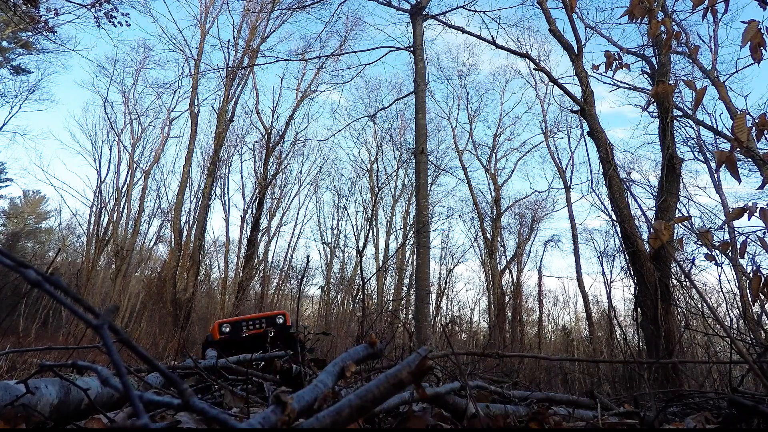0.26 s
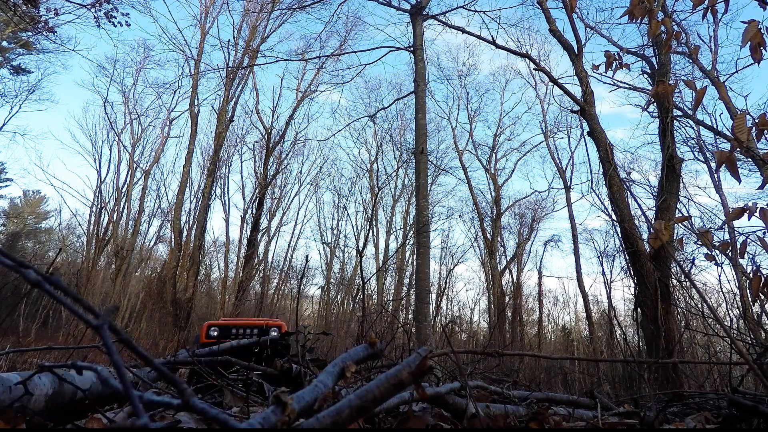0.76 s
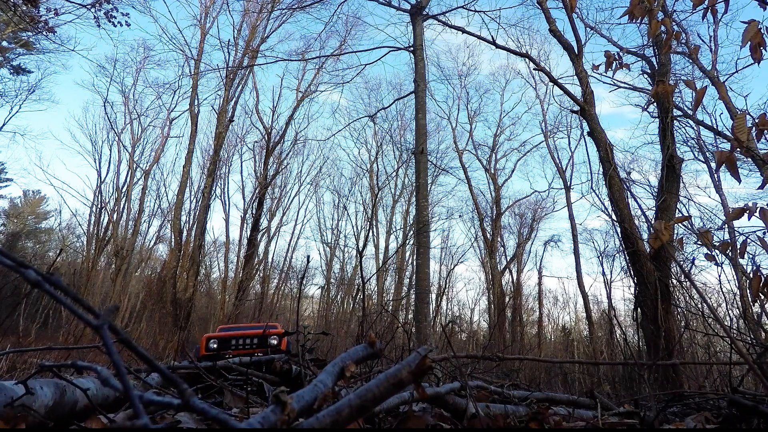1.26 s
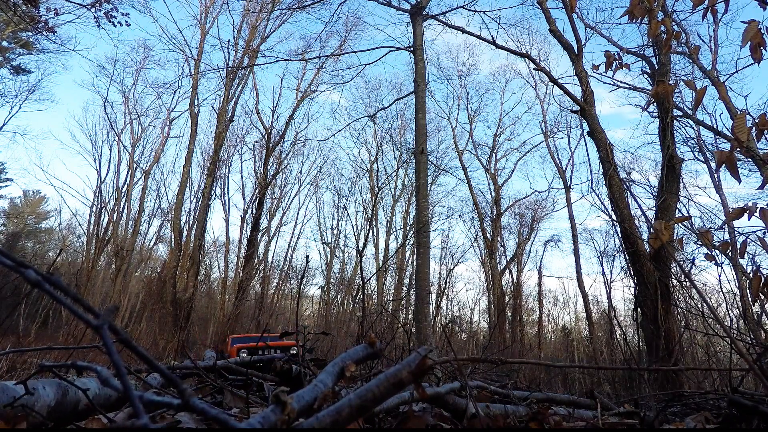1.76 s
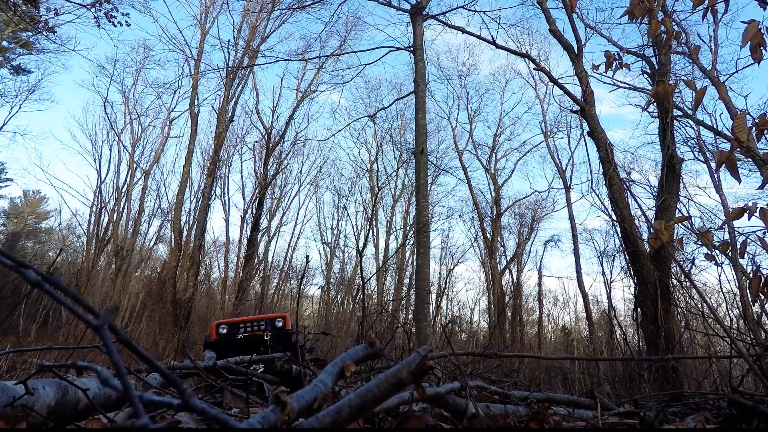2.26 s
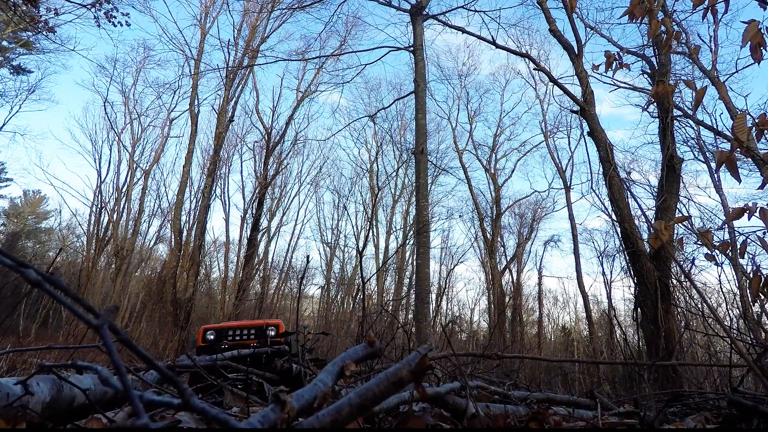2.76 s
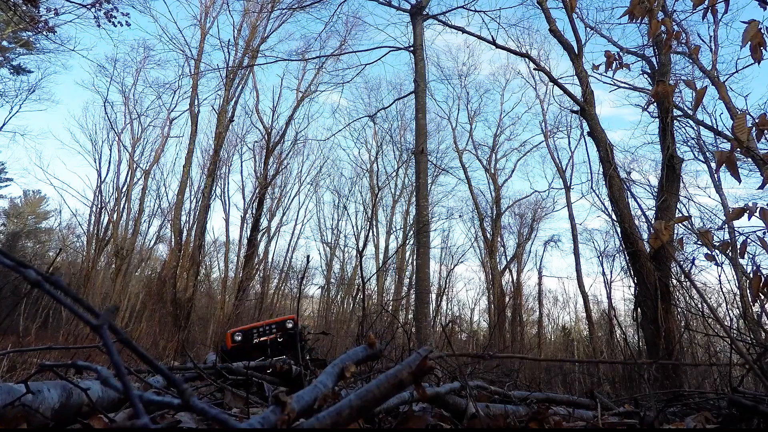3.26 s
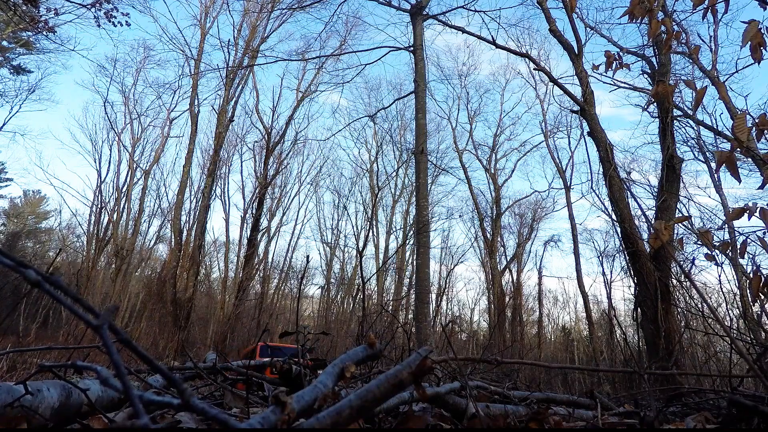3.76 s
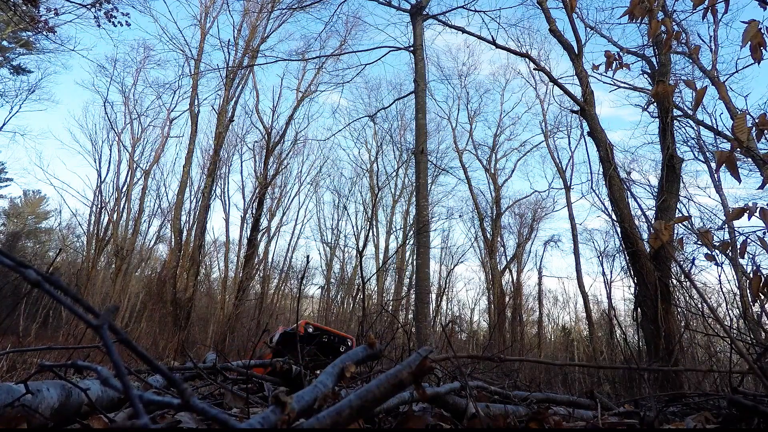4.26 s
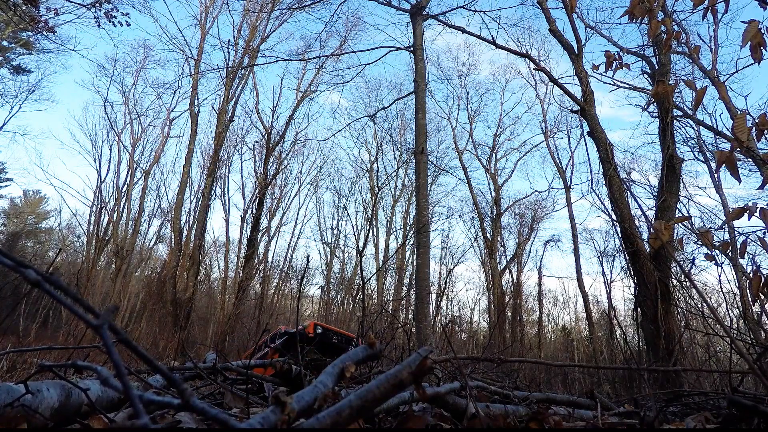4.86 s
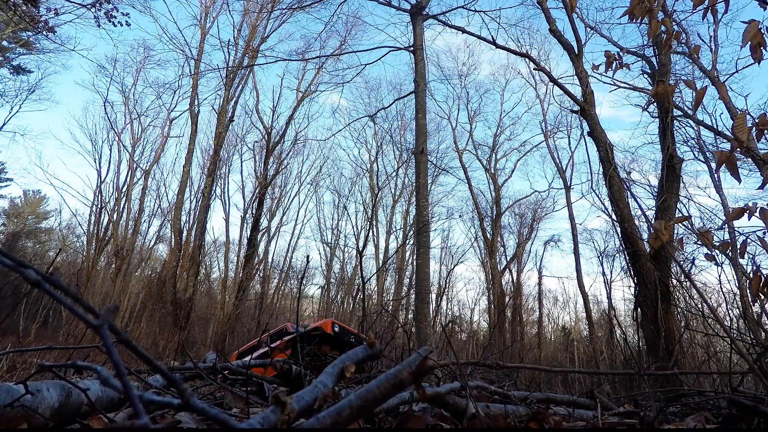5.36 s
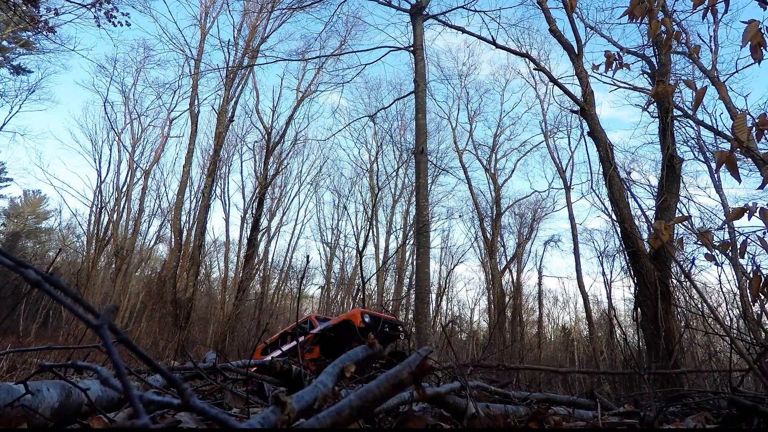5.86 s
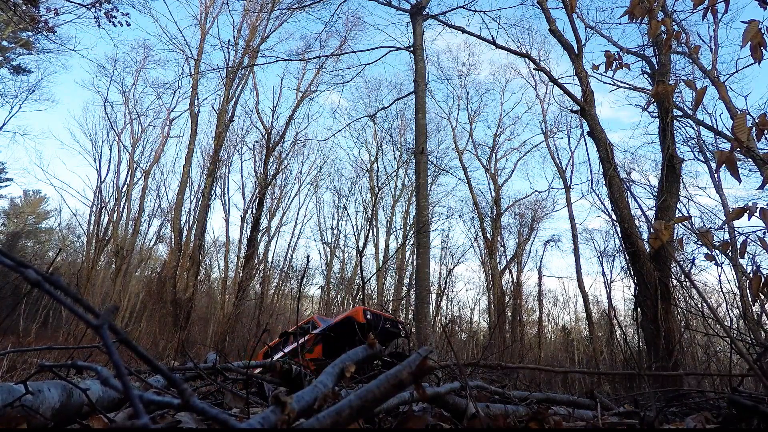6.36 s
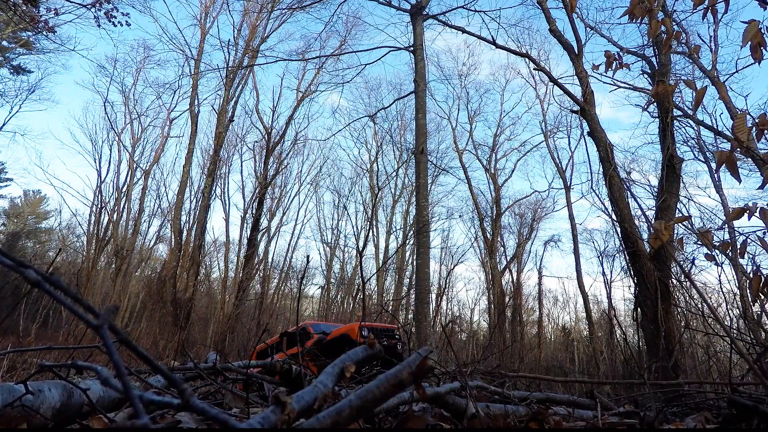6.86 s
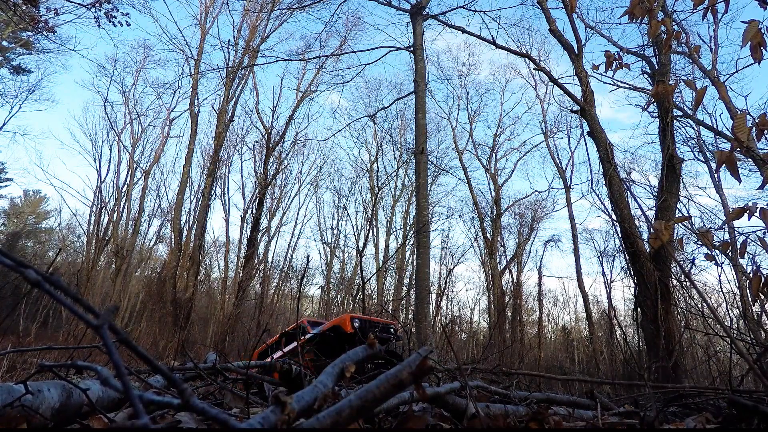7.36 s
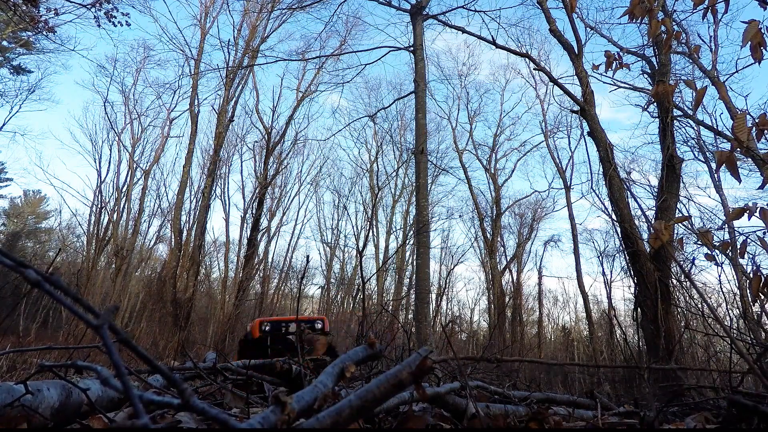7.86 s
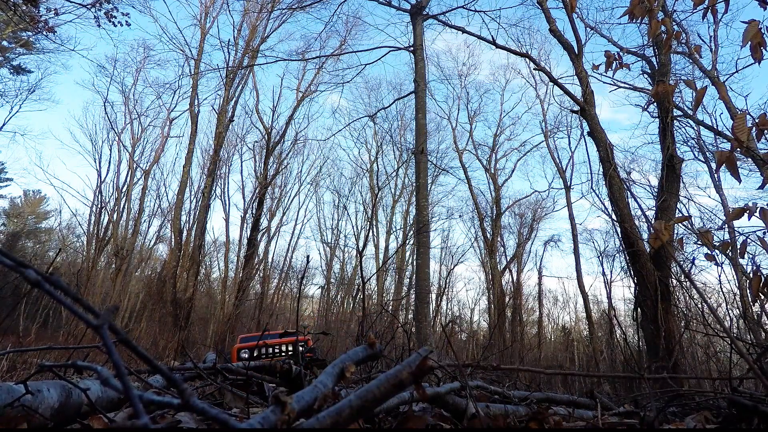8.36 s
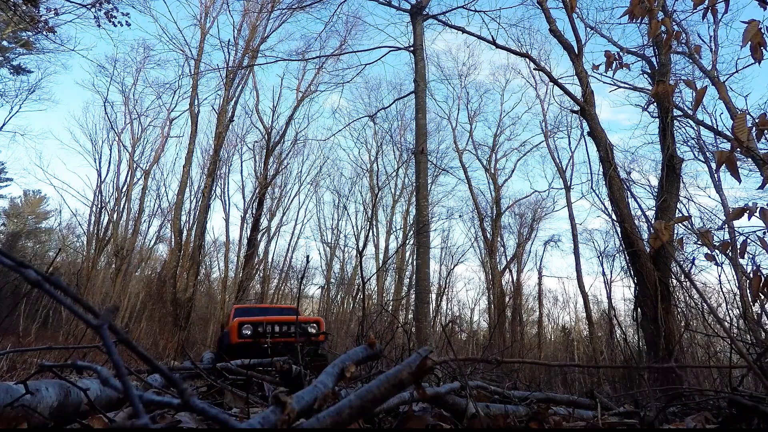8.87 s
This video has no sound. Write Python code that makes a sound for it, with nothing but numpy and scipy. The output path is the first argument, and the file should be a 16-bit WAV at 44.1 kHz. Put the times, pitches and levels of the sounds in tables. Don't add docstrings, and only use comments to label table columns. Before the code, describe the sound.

A small electric model truck works across dead branches and dry leaves in open woodland. Bursts of gritty crunching and dull, boxy knocks come with sharp twig snaps and a brief servo chirp. After a loud flurry of cracks it quietens, gears whining unsteadily through a climb, then wheels thump down off bark, a heavy knock lands, and the gears sing once more. The microphone is close and low, its case booming hollowly, with little echo.

```python
import sys
import numpy as np
from scipy import signal
from scipy.fft import rfft, irfft, next_fast_len
from scipy.io import wavfile
from scipy.ndimage import uniform_filter1d, map_coordinates

SR = 44100
rng = np.random.default_rng(int(sys.argv[2]) if len(sys.argv) > 2 else 0)


def undo_db(level):
    steps = np.asarray(level, float) / 20
    return 10 ** steps


def master_out(mix):
    frames = np.transpose(np.atleast_2d(mix))
    ceiling = np.clip(frames, -1, 1)
    pcm = np.round(ceiling * 32767).astype(np.int16)
    wavfile.write(sys.argv[1], SR, pcm)


N = 401310

# (start [s], end [s], first effort [dB], last effort [dB], pile load over effort [dB])
PUSHES = [(0.0, 0.294, -49, -49.5, 6), (0.638, 0.923, -41.5, -45, 5), (1.05, 1.233, -61.5, -61, 5.5),
          (1.277, 1.511, -42.5, -42, 8.5), (1.576, 1.67, -65, -55, 13), (1.786, 1.905, -55.5, -56.5, -2),
          (1.938, 2.355, -53, -46.5, 7), (2.371, 2.695, -42.5, -42.5, 3.5), (2.745, 2.884, -54.5, -53, 3),
          (2.914, 3.34, -42.5, -41, 7.5), (3.879, 5.63, -52, -43.5, 7.5), (5.64, 5.898, -41, -42, 4.5),
          (5.922, 6.026, -48, -51, 10), (6.176, 6.525, -43, -43.5, 8.5), (6.558, 6.617, -49, -59, 17),
          (6.688, 6.76, -57, -60, -5), (6.815, 6.914, -52, -40.5, 5), (6.951, 7.069, -42, -46.5, 11.5),
          (7.165, 7.491, -40, -40.5, 6.5), (7.613, 7.906, -37.5, -38.5, 7.5),
          (7.926, 8.082, -44, -58, 13.5), (8.155, 8.33, -58.5, -60.5, 12), (8.45, 8.764, -49, -45, 8),
          (8.787, 9.08, -51.5, -47, 5)]
# (time [s], thud [dB], length [s], grind over thud [dB])
LURCHES = [(0.163, -37.5, 0.072, -20), (0.408, -35, 0.097, -29), (0.812, -28.5, 0.1, -14),
           (1.37, -34.5, 0.15, -5.5), (1.494, -28, 0.12, -36), (2.401, -25.5, 0.038, -34),
           (3.077, -24.5, 0.096, -14), (3.398, -30.5, 0.08, -16), (3.55, -38.5, 0.076, -14.5),
           (5.377, -37, 0.23, -43), (6.46, -42, 0.09, -30), (6.968, -35, 0.027, -4.5),
           (7.342, -30.5, 0.2, -8.5), (7.748, -23.5, 0.097, -18), (8.55, -54, 0.052, -8),
           (9.086, -22, 0.021, -17)]
LURCH_FADE_DB = 15


def truck():
    idle_db, idle_pile_db = -62, -62.5
    spin_up_db_per_s, coast_db_per_s = 287, 295
    pile_loads_db_per_s, pile_settles_db_per_s = 260, 173
    t = np.arange(N // 20 + 2) * 20 / SR
    effort = np.full(len(t), undo_db(idle_db))
    pile = np.full(len(t), undo_db(idle_pile_db))
    for start, end, first_db, last_db, weight_db in PUSHES:
        held_db = np.interp(t, [start, end], [first_db, last_db])
        early, late = np.maximum(start - t, 0), np.maximum(t - end, 0)
        push_db = held_db - spin_up_db_per_s * early - coast_db_per_s * late
        load_db = held_db + weight_db - pile_loads_db_per_s * early - pile_settles_db_per_s * late
        effort = np.maximum(effort, undo_db(push_db))
        pile = np.maximum(pile, undo_db(load_db))
    for s, db, length, grind_db in LURCHES:
        lurch = undo_db(db - LURCH_FADE_DB * abs(t - s) / length)
        effort = np.hypot(effort, undo_db(grind_db) * lurch)
        pile = np.hypot(pile, lurch)
    return curves(np.c_[t, 20 * np.log10(effort), 20 * np.log10(pile)])


# (time [s], grip [dB])
GRIP = [(0.0, 8), (0.2, -3), (0.39, 4), (0.55, -5), (0.85, 4.5), (1.38, 1), (2.0, -5.5), (2.6, 6),
        (3.3, -2), (4.04, 1), (5.4, -4), (7.16, -3), (7.4, 0.5), (7.6, -8), (7.8, -1), (8.5, 0),
        (8.72, 4.5), (8.82, 5)]
# (time [s], scrape [dB], length [s])
SKID = (3.06, -27.5, 0.02)
# (frequency [Hz], width [Hz], level [dB])
BOOM = [(473, 180, -1)]
# (frequency [Hz], width [Hz], level [dB])
BODY = [(7500, 260, 2), (10400, 380, 2), (11500, 320, 1)]
# (frequency [Hz], density [dB per Hz])
THUD = [(24, -45), (40, -37), (49, -4), (151, -4.5), (238, -6.5), (371, -3.5), (407, -4.5), (451, -2),
        (601, -14.5), (900, -24.5), (1170, -71), (1980, -120)]
# (frequency [Hz], density [dB per Hz])
GRIND = [(820, -9.5), (1400, -13.5), (1980, -3.5), (2160, -2), (2880, -0.5), (3690, -0.5), (4030, -3),
         (4690, 0.5), (7650, -7.5), (9500, -40), (12400, -43), (20900, -120)]
# (frequency [Hz], density [dB per Hz])
CRACKLE = [(4710, -36), (8000, 0), (9020, -10), (11400, -9), (14500, -12), (15200, -21), (15600, -21)]
# (frequency [Hz], density [dB per Hz])
SCRAPE = [(350, 9), (600, -18), (743, 4), (973, -4), (1090, -1), (1490, -7), (1700, 0.5), (2210, -19.5),
          (3740, -120)]


def tyres(grind_db, thud_db):
    grip_db, = curves(GRIP)
    full_db = -38
    crackle_db = -62.5 + 0.69 * (grind_db - full_db) + grip_db
    scrape_db = -9 + grind_db + 0.53 * (thud_db - grind_db) + 0.91 * grip_db
    jolt = np.tanh(wobble(30))

    lumps = grit(140, spread_db=2.5, life_s=.006, share=.15)
    thud = unit(filtered(coloured(lumps, THUD), ringing(BOOM, lift_db=-6.5)))
    crumbs = grit(400, spread_db=1.5, life_s=0.0025, share=0.4)
    grind = coloured(patchy(crumbs, depth_db=2.5), GRIND)
    crackle = coloured(grit(170, spread_db=-15, life_s=0.0016, share=0.19), CRACKLE)
    crackle = unit(filtered(crackle, ringing(BODY, lift_db=-3)))
    scrape = coloured(grit(120, spread_db=-22.0, life_s=0.0029, share=0.3), SCRAPE)

    rake_s, rake_db, rake_length_s = SKID
    rake = undo_db(rake_db - LURCH_FADE_DB * abs(np.arange(N) / SR - rake_s) / rake_length_s)
    out = undo_db(thud_db - 0.5 + 1.68 * jolt + 0.44 * wobble(15)) * thud
    out = out + (undo_db(scrape_db + 2.8 * jolt) + rake) * scrape
    out = out + undo_db(grind_db - 3.0 + 0.72 * jolt) * grind
    return out + undo_db(crackle_db + 1.7 * jolt) * crackle


# (frequency [Hz], width [Hz], level [dB])
SHELL = [(1089, 46, -4.5), (1620, 68, -15), (2200, 54, -2.5), (2750, 73, -0.5), (3280, 11, -4.5),
         (3700, 72, 0.5), (3937, 64, -0.5), (4390, 100, 4), (4714, 87, 2.5), (5180, 76, 2.5),
         (5560, 140, 0.5), (6440, 49, -2), (7860, 30, -6), (10200, 360, -17), (11900, 1400, -18)]
# (start [s], end [s],
# frequency [Hz], level over grind [dB])
SINGS = [(0.036, 0.356, 3670, -8.5), (0.205, 0.346, 4540, -0.5), (0.59, 0.79, 3790, -9),
         (0.648, 0.76, 4820, -2.5), (1.05, 1.198, 4780, -9), (1.857, 2.044, 5320, -8),
         (1.798, 2.017, 7800, -10), (1.997, 2.15, 3700, -10), (2.0, 2.283, 2750, -20),
         (2.29, 2.403, 4360, -13), (2.74, 2.88, 5560, -7), (2.865, 3.01, 4900, -7),
         (3.08, 3.386, 4390, -9.5), (3.182, 3.376, 3700, -14)]
# (start [s], end [s], frequency [Hz], width
# [Hz], level over grind [dB])
WIDE_SINGS = [(1.95, 2.2, 6000, 300, -18), (2.15, 2.3, 5000, 300, -8), (2.36, 2.46, 6000, 200, -19),
              (4.15, 4.6, 4800, 320, -6), (4.2, 4.5, 6900, 250, -12), (4.2, 4.7, 10300, 400, -32),
              (4.75, 4.6, 11500, 300, -29), (4.55, 4.95, 3600, 120, -7.5), (5.22, 5.2, 6500, 230, -12),
              (5.5, 5.55, 5700, 270, -11), (5.69, 5.925, 4500, 250, -7), (5.7, 5.6, 5600, 600, -9.5),
              (5.1, 5.17, 5600, 400, -7), (5.275, 5.3, 5700, 500, -5), (7.93, 8.04, 7700, 830, -8.5),
              (7.1, 7.2, 3600, 200, -6), (7.9, 7.43, 2200, 150, -12.5), (7.2, 7.45, 11000, 308, -32),
              (8.1, 8.1, 4300, 250, -19), (8.45, 8.559, 6600, 250, -8), (8.76, 9.0, 3650, 60, -15),
              (9.2, 9.8, 2750, 100, -10), (8.8, 9.08, 4600, 200, -5)]


def rattle(grind_db):
    teeth = grit(120, spread_db=1.0, life_s=0.0031, share=0.38)
    shell = sum(undo_db(db + 3 * wobble(7)) * mode(teeth, hz, width) for hz, width, db in SHELL)
    out = undo_db(-4.5) * unit(shell)
    for start, end, hz, db in SINGS:
        out = out + undo_db(db) * gate(start, end, 0.01) * mode(teeth, hz, 71)
    for start, end, hz, width, db in WIDE_SINGS:
        out = out + undo_db(db) * gate(start, end, 0.022) * mode(teeth, hz, width)
    return undo_db(grind_db) * out


# (time [s], mesh [Hz], second harmonic [dB])
PULL = [
    (1.93, 720, -61),
    (2.0, 960, -61),
    (2.04, 1120, -68),
    (2.1, 1380, -56),
    (2.13, 1500, -63),
    (2.17, 1680, -54),
    (2.23, 1890, -49),
    (2.28, 1890, -52),
    (2.3, 1600, -59),
    (2.38, 1600, -61),
]
# (time [s], mesh [Hz], second harmonic [dB])
CLIMB = [
    (3.85, 1840, -57),
    (3.96, 1690, -60),
    (4.04, 1820, -50),
    (4.14, 1610, -69),
    (4.28, 1695, -46.5),
    (4.35, 1832, -54),
    (4.4, 2120, -49),
    (4.47, 1680, -48),
    (4.56, 1990, -53),
]
# (time [s], mesh [Hz], second harmonic [dB])
SCRABBLE = [
    (4.56, 1994, -50),
    (4.619, 2060, -48),
    (4.69, 2396, -47),
    (4.84, 2532, -43.5),
    (4.93, 2405, -46),
    (4.97, 2036, -48),
    (5.03, 2320, -48),
    (5.09, 2430, -44),
    (5.144, 1994, -48),
]
# (time [s], mesh [Hz], second harmonic [dB])
CREST = [(5.145, 1964, -50), (5.2, 2220, -48), (5.275, 2503, -43.5), (5.31, 2237, -46.5), (5.41, 2200, -50),
         (5.45, 1995, -43), (5.48, 1852, -42), (5.53, 1840, -42), (5.57, 2233, -42.5), (5.6, 2340, -43),
         (5.675, 2380, -34), (5.69, 2360, -67)]
# (time [s], mesh [Hz], second harmonic [dB])
LUNGE = [
    (8.45, 1740, -56),
    (8.47, 1790, -45),
    (8.51, 1830, -45),
    (8.522, 2100, -62),
    (8.535, 2190, -43),
    (8.58, 2390, -44),
    (8.62, 2510, -46),
    (8.665, 2520, -47),
    (8.7, 2400, -64),
]
# (mesh [Hz], level over second harmonic [dB])
MESH_OVER_OCTAVE = [(700, 6), (1650, -0.5), (1890, -3), (2040, -33), (2600, -4)]
# (time [s], gear [Hz], third harmonic [dB])
SERVO = [
    (1.8, 1400, -62),
    (1.85, 1560, -55),
    (1.9, 1380, -61),
]
# (gear [Hz], second over third harmonic [dB])
SERVO_SECOND_OVER_THIRD = [(1350, 7), (1560, -3)]


def gears():
    runs = (PULL, CLIMB + SCRABBLE + CREST, LUNGE)
    drive = whine(runs, MESH_OVER_OCTAVE, 1, slip=.011, bite_db=2.2, free_db=13)
    servo = whine((SERVO,), SERVO_SECOND_OVER_THIRD, 2, slip=.026, bite_db=5, free_db=0)
    return undo_db(-7.0) * filtered(drive, ringing(SHELL, lift_db=4.5)) + servo


def whine(runs, balance, first, slip, bite_db, free_db):
    hz, high_db = curves(np.concatenate(runs))
    unloaded = gate(runs[-1][0][0], N / SR, 1 / SR)
    low_db = high_db + np.interp(hz, *np.transpose(balance)) - free_db * unloaded
    loose = np.clip(hz / 700 - 2.2, .55, 1)
    flutter = slip * loose * (wobble(45) + wobble(400))
    phase = 2 * np.pi * np.cumsum(hz * (1 + flutter)) / SR
    load = np.tanh(wobble(30)) + 2 * np.tanh(wobble(80)) + wobble(200)
    bite = unit(undo_db(bite_db * loose * load))
    runout = 1 + .7 * loose * np.cos(phase / 7 + 2 * wobble(60))

    low = np.sin(first * phase)
    high = np.sin((first + 1) * phase)
    third = undo_db(-12) * np.sin((first + 2) * phase)
    chatter = wobble(380) * high + wobble(380) * np.cos((first + 1) * phase)
    tone = undo_db(high_db - 4.5) * loose ** 2 * chatter + undo_db(low_db) * low
    tone = tone + undo_db(high_db - 4 * loose) * runout * (high + third)
    sounding = sum(gate(rows[0][0], rows[-1][0], 0.015) for rows in runs)
    return np.sqrt(2) * sounding * bite * tone


# (time [s], peak [dB], wood [Hz])
KNOCKS = [(0.019, -23.5, 479), (0.148, -27, 336), (0.402, -25, 320), (0.43, -27, 250), (0.46, -27, 152),
          (0.53, -29.5, 110), (3.09, -22, 166), (0.617, -38, 436), (0.79, -16.5, 126), (1.301, -16, 419),
          (1.935, -26.5, 415), (2.386, -21.5, 475), (2.576, -31, 497), (2.816, -29, 140), (3.038, -20, 450),
          (3.079, -16, 132), (2.388, -17, 105), (8.761, -31.5, 151.9), (4.576, -22.5, 451),
          (4.667, -26, 424), (5.292, -20, 441), (5.376, -26, 496), (5.47, -19, 369), (5.744, -22, 494),
          (6.184, -31, 450), (6.46, -19, 430), (6.894, -26, 189), (6.895, -27, 444), (7.718, -10, 455.5),
          (8.513, -30, 344), (8.913, -31, 425), (8.799, -32, 399), (2.95, -33, 199), (7.59, -34, 400),
          (0.372, -30, 425), (0.705, -29, 380), (0.756, -25, 409), (1.484, -16.5, 427), (1.581, -31, 428),
         (2.37, -24, 440), (2.506, -25, 457), (3.167, -18, 430), (3.198, -19, 430), (3.258, -26, 490),
         (3.35, -22, 393), (4.817, -34, 463), (4.86, -30, 380), (5.333, -20, 367), (5.979, -30, 483),
         (6.231, -27, 465), (6.338, -22, 380), (6.406, -23, 436), (6.517, -20.5, 488), (6.551, -26, 473),
         (6.86, -34, 447), (6.95, -29, 455), (7.002, -25, 474), (7.14, -32.5, 412), (7.176, -23, 336),
         (7.237, -23, 411), (7.294, -20, 371), (7.472, -27, 425), (7.628, -24, 440), (7.753, -17, 453),
         (7.817, -19.5, 390), (7.936, -21, 492), (8.19, -32, 387), (9.079, -19, 401)]


def knocks():
    out, t = np.zeros(N + SR), np.arange(SR // 4) / SR
    for s, db, hz in KNOCKS:
        wood = np.sin(2 * np.pi * hz * t)
        case = 0.33 * np.sin(2 * np.pi * BOOM[0][0] * t + rng.uniform(0, 2 * np.pi))
        envelope = undo_db(db - 4.0 - 60 * t / 0.072) * (1 - np.exp(-t / 0.002))
        out[round(s * SR):][:len(t)] += envelope * (wood + case)
    return out[:N]


# (time [s], peak [dB], ring [Hz], hollow log [dB])
SNAPS = [(0.152, -36.5, 2580, 5.5), (0.204, -33, 4100, -10), (0.5054, -39.5, 2750, -35),
         (0.6, -40, 3870, -27), (1.0014, -45, 1640, -28), (1.0017, -39.5, 2480, -40),
         (1.4508, -28, 3700, -22), (1.4774, -29, 4320, -2), (1.516, -31.5, 3700, -5),
         (1.5806, -40.5, 4360, -4), (1.9216, -35.5, 5300, -2), (2.5647, -34.5, 2830, -28),
         (3.0298, -22, 5100, -21), (3.062, -15.5, 5370, -14), (3.196, -22.5, 3850, -9.5),
         (3.483, -39, 5230, -13), (3.5218, -42.5, 3280, -4), (4.4682, -35, 4800, -23),
         (5.651, -35.5, 1663, 0), (6.5066, -36, 3700, -21), (6.805, -41, 3700, -11), (6.889, -36, 2700, -3),
         (6.9491, -31.5, 2240, -8), (7.5732, -32, 4570, -27), (8.154, -50, 3976, -26),
         (8.19, -46, 5060, -21), (8.403, -47, 4390, -6), (8.4443, -35, 4560, -23), (9.0745, -30, 2550, -6),
         (9.074, -30, 6100, -30)]
# (time [s], peak [dB], ring [Hz], hollow log [dB])
SPLITS = [
    (0.3926, -28.5, 5200, -17),
    (0.9462, -35, 2430, -26),
    (1.3028, -25.5, 3700, 0),
    (1.3345, -31, 2490, -11),
    (1.3603, -27, 2560, -1),
    (2.501, -32, 2750, -34),
    (2.525, -22.5, 4300, -36),
    (2.7008, -33, 2400, -29),
]


def twigs():
    body, tick, log = np.zeros((3, N + SR))
    t = np.arange(SR // 8) / SR
    rise = 1 - np.exp(-t / 0.0005)
    dull = [(*row, -24, .33) for row in SNAPS]
    brittle = [(*row, -9, .05) for row in SPLITS]
    for s, db, hz, log_db, tick_db, share in dull + brittle:
        noise = rng.standard_normal((2, len(t)))
        at = round(s * SR)
        ring = share * undo_db(-60 * t / .024) * np.sin(2 * np.pi * hz * t)
        crack = unit(signal.lfilter(*signal.iirpeak(hz, 2.4, SR), noise[0]) + .15 * noise[0])
        log_hz = 825 * (1 + .05 * noise[1, -1])
        tap = rise * np.sin(2 * np.pi * log_hz * t)
        body[at:][:len(t)] += undo_db(db) * rise * (0.58 * undo_db(-60 * t / 0.017) * crack + ring)
        tick[at:][:len(t)] += undo_db(db + tick_db - 60 * t / 0.018) * noise[1]
        log[at:][:len(t)] += undo_db(db + log_db + 1.5 - 60 * t / .03) * tap
    leafy = lambda f: (1j * f / 1000) / (1 + 1j * f / 1000) / (1 + 1j * f / 6500) ** 3
    bright = lambda f: ((1j * f / 8500) / (1 + 1j * f / 8500)) ** 4
    return undo_db(8.5) * filtered(body[:N], leafy) + undo_db(8.0) * filtered(tick[:N], bright) + log[:N]


# (time [s], peak [dB], body under 6 kHz over peak [dB])
TICKS = [(0.3726, -40, -1), (0.4294, -52, 0), (0.5352, -47, 0), (0.619, -43, 3), (0.628, -46, 5),
         (0.8599, -29, -7), (0.8949, -31, -4), (1.2845, -37, -1), (1.3823, -34, -4), (2.4294, -28.5, 0),
         (2.4444, -27, -5), (2.5175, -23, -5), (2.6244, -32, -4), (2.9185, -33, 5), (3.1492, -28, -7),
         (3.2345, -35, 3), (3.3358, -41, 3), (3.3593, -42, 5), (3.3832, -42, -5), (4.3884, -49, 2),
         (4.5194, -48, 6), (4.7955, -40, 8), (5.2824, -43, 0), (5.3183, -47, -3), (5.4006, -49, -2),
         (5.7154, -41, -2), (5.7867, -40, 5), (5.879, -43, 1), (6.2198, -40, 0), (6.2502, -33, 5),
         (6.322, -36, 3), (6.904, -32.5, 7.5), (6.9676, -39, -3), (7.5852, -41, 3), (7.7119, -41, -1),
         (7.7624, -26, -3), (7.8615, -35, -2), (7.9823, -39, -9), (8.7394, -47, 0), (8.8344, -47, 8)]


def leaves():
    top, body = np.zeros((2, N + SR))
    t = np.arange(SR // 20) / SR
    for s, db, body_db in TICKS:
        at = round(s * SR)
        crack = undo_db(db - 60 * t / 0.01) * rng.standard_normal(len(t))
        top[at:][:len(t)] += undo_db(-10) * crack
        body[at:][:len(t)] += undo_db(-4.5 + body_db) * crack
    high = lambda f: ((1j * f / 5500) / (1 + 1j * f / 5500)) ** 3
    middle = lambda f: (1j * f / 2500) / (1 + 1j * f / 2500) ** 2 / (1 + 1j * f / 6000)
    return 2 * filtered(top[:N], high) + 4 * filtered(body[:N], middle)


def trunks(x):
    t = np.arange(SR // 4) / SR
    tail = rng.standard_normal(len(t)) * undo_db(-60 * t / 0.075)
    delayed = np.pad(x, (130, 0))
    return signal.fftconvolve(delayed, tail / np.linalg.norm(tail))[:N]


# (frequency [Hz], density [dB per Hz])
WOODS = [(24, -45), (40, 0.5), (123, -6), (193, -19), (450, -19), (1000, -35.5), (4050, -50), (4480, -40),
         (5070, -57), (6190, -36), (8790, -49), (13100, -46), (15600, -54)]
# (time [s], level [dB])
BREEZE = [(0.0, -41), (2.36, -45), (3.14, -41), (3.88, -47), (5.17, -44), (6.18, -47), (7.8, -40),
          (9.1, -45.5)]


def woods():
    throb = np.sin(2 * np.pi * np.cumsum(28 + 3 * wobble(2.9)) / SR)
    rumble_band = lambda f: (f > 18) / (1 + (f / 42) ** 4)
    rumble = unit(filtered(rng.standard_normal(N), rumble_band))
    hiss = undo_db(-53 + 3.5 + 2.7 * wobble(3.28)) * coloured(rng.standard_normal(N), WOODS)
    return hiss + undo_db(curves(BREEZE)[0]) * unit(throb + 0.8 * rumble)


def unit(x):
    return x / np.sqrt(np.mean(x ** 2) + 1e-20)


def curves(rows):
    s, *cols = np.transpose(rows)
    return [np.interp(np.arange(N) / SR, s, c) for c in cols]


def gate(start, end, ramp):
    t = np.arange(N) / SR
    return np.clip(np.minimum(t - start, end - t) / ramp, 0, 1)


def wobble(rate):
    knots = rng.standard_normal(int(N * rate / SR) + 4)
    return map_coordinates(knots, [np.arange(N) * rate / SR])


def grit(rate, spread_db, life_s, share):
    size = np.minimum(rng.exponential(1, N), 1.8)
    breaks = (rng.random(N) < rate / SR) * undo_db(spread_db * size)
    burst = signal.lfilter([1], [1, -np.exp(-1 / (life_s * SR))], breaks)
    bursts = unit(burst * rng.standard_normal(N))
    return np.sqrt(1 - share) * rng.standard_normal(N) + np.sqrt(share) * bursts


def patchy(x, depth_db):
    z = signal.stft(x, nperseg=256)[2]
    field = uniform_filter1d(rng.standard_normal(z.shape), 3, 0)
    field = uniform_filter1d(field, 9, 1)
    return signal.istft(z * undo_db(depth_db * unit(field)), nperseg=256)[1][:N]


def filtered(x, response):
    m = next_fast_len(N + SR // 2)
    return irfft(rfft(x, m) * response(np.fft.rfftfreq(m, 1 / SR)), m)[:N]


def coloured(x, spectrum):
    f, db = np.transpose(spectrum)
    return unit(filtered(x, lambda hz: undo_db(np.interp(np.log(hz + 1), np.log(f + 1), db))))


def ringing(modes, lift_db):
    def resonance(f, hz, width, db):
        return undo_db(db + lift_db) * 1j * f * width / (hz * hz - f * f + 1j * f * width)
    return lambda f: 1 + sum(resonance(f, *row) for row in modes)


def mode(x, hz, width):
    return unit(signal.lfilter(*signal.iirpeak(hz, hz / width, SR), x))


def scene():
    effort_db, pile_db = truck()
    rolling = tyres(effort_db, pile_db) + rattle(effort_db)
    hits = twigs() + gears() + leaves()
    mix = rolling + undo_db(1.0) * knocks() + hits + undo_db(-6.5) * trunks(hits) + woods()
    return mix[None]


def low_pass(x):
    return signal.sosfilt(signal.butter(12, 16380, fs=SR, output="sos"), x)


def record(dry):
    top_hz = 15450
    mix = filtered(dry[0], lambda hz: hz < top_hz)[None]
    return low_pass(mix)


dry = scene()
out = record(dry)
master_out(out)
```